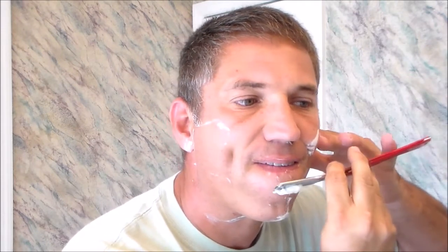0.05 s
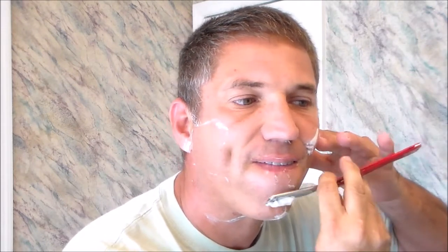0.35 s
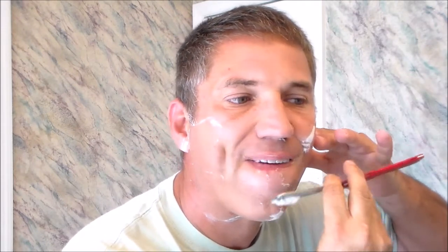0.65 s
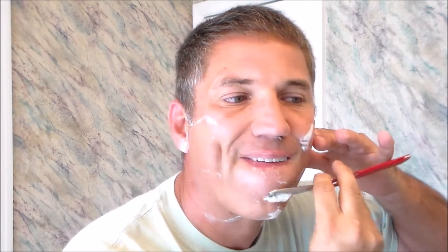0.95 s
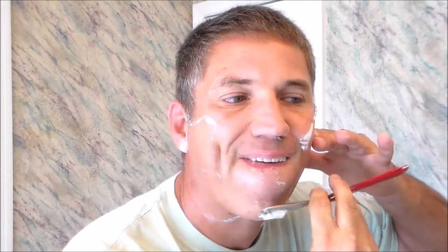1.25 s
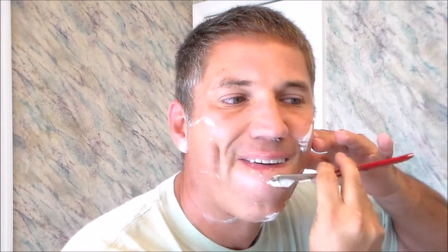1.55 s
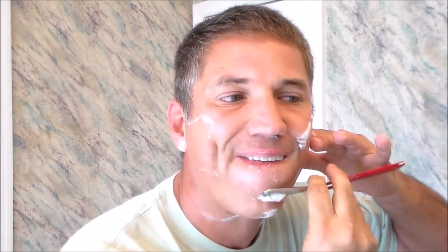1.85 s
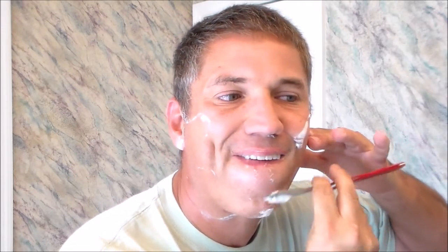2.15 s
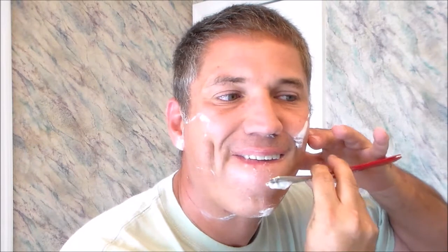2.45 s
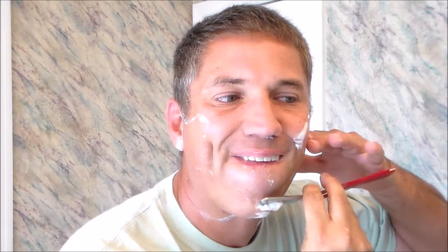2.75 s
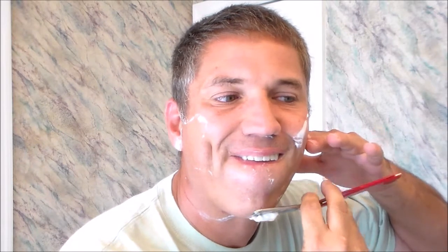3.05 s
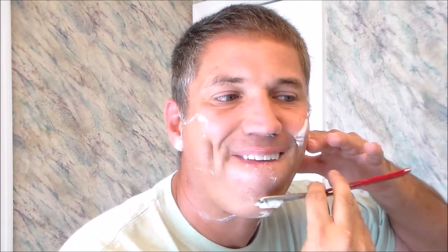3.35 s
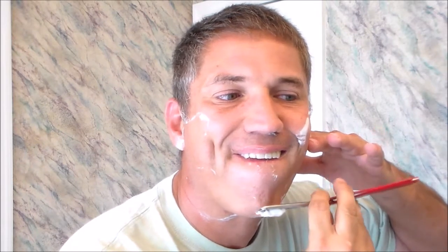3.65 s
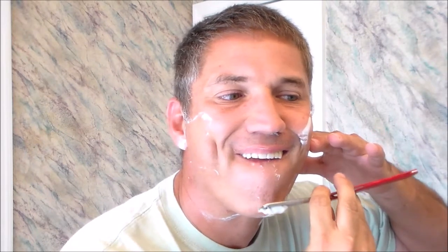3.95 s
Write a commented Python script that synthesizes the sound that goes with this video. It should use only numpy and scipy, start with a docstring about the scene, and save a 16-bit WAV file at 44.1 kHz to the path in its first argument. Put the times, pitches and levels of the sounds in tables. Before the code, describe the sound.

Short, soft razor strokes crackle through chin stubble in a slightly echoing bathroom, the lather ticking twice. A sharp metal clink follows, then dull bumps and a lighter clink. Faint hiss, hum and fan noise continue throughout.

```python
"""A stone-walled bathroom, heard on a closely spaced pair of microphones over mains hum, a fan and hiss.
A razor is drawn over a lathered chin in five short bouts: cut stubble crackles and rings the thin blade,
and the lather gives two wet ticks. Near the end something metal clinks, bumps dully a few times and
clinks again more lightly. Each stroke and contact carries a short tail from the walls."""
import sys
import numpy as np
from scipy import signal
from scipy.fft import rfft, irfft
from scipy.io import wavfile

SR = 44100
rng = np.random.default_rng(int(sys.argv[2]) if len(sys.argv) > 2 else 0)


def transcribe(signal):
    """Save signal, clipped to [-1, 1], as a 16-bit WAV file at the path in sys.argv[1]."""
    frames = np.atleast_2d(signal).T
    limited = np.clip(frames, -1, 1)
    pcm = np.round(limited * 32767).astype(np.int16)
    wavfile.write(sys.argv[1], SR, pcm)


N = 176400
TIME, FREQ = np.arange(N) / SR, np.arange(N // 2 + 1) * SR / N


def undb(db):
    """Decibels to gain."""
    return 10 ** (np.asarray(db) / 20)


def unit(x):
    """Scale to rms 1."""
    return x / np.sqrt(np.mean(x ** 2))


def along(points, hz):
    """Read a table on a log-frequency axis."""
    freqs, values = np.array(points, float).T
    return np.interp(np.log(np.maximum(hz, 1)), np.log(freqs), values)


def colour(points):
    """Causal frequency response of (Hz, dB) points, with mean power 1."""
    cepstrum = irfft(np.log(undb(along(points, FREQ))))
    cepstrum[1:N // 2] *= 2
    cepstrum[N // 2 + 1:] = 0
    response = np.exp(rfft(cepstrum))
    return response / np.sqrt(np.mean(abs(response) ** 2))


def resonance(hz, width):
    """Band-pass response, gain 1 at the centre."""
    return 1j * FREQ * width / (hz ** 2 - FREQ ** 2 + 1j * FREQ * width)


def through(x, response):
    """Pass a sound through a frequency response."""
    return signal.fftconvolve(x, irfft(response)[:N // 10])[:N]


def walk(rate_hz):
    """Random values joined by straight lines."""
    return np.interp(TIME * rate_hz, np.arange(N), rng.standard_normal(N))


def burst(start, decay_s):
    """A rough contact: decaying noise of unit energy."""
    age = TIME - start
    noise = rng.standard_normal(N) * (age >= 0) * np.exp(-np.clip(age / decay_s, 0, 20))
    return noise / np.sqrt(np.sum(noise ** 2))


# likeness of diffuse sound at the two microphones (frequency [Hz], coherence [0-1])
MIC_COHERENCE = [(30, 0.87), (130, 0.74), (290, 0.65), (640, 0.76), (1400, 0.47), (3080, 0.053),
                 (14000, .01)]


def diffuse(size):
    """Spectra of a noise field at two close microphones: alike in the bass, unrelated in the treble."""
    mid, side = rfft(rng.standard_normal((2, size)))
    coherence = along(MIC_COHERENCE, np.arange(len(mid)) * SR / size)
    return mid * np.sqrt(1 + coherence) + np.array([[1], [-1]]) * side * np.sqrt(1 - coherence)


# air and hiss all round the microphones (frequency [Hz], relative density [dB])
AIR_SPECTRUM = [(12, -4), (28, 4), (42, -5), (80, -3.5), (150, -12), (300, -15.5), (520, -17.5), (760, -17),
                (1200, -24), (2200, -28.7), (5000, -31), (10000, -32.5), (14500, -33)]
# harmonics of the mains (frequency [Hz], level [dB])
MAINS_HARMONICS = [(59.95, -51), (120, -71), (179.8, -65), (299.7, -72), (420, -75), (660, -77.5)]


def room_tone():
    """Moving air and hiss, with wavering mains hum and a faint fan drone a little to the right."""
    air = undb(-52) * unit(irfft(undb(along(AIR_SPECTRUM, FREQ)) * diffuse(N)))
    hum = 0
    for hz, db in MAINS_HARMONICS:
        amplitude = np.sqrt(2) * undb(db + walk(rate_hz=3.04))
        hum += amplitude * np.sin(2 * np.pi * (hz * TIME + rng.random()))
    fan_band = resonance(hz=215.5, width=24) ** 2
    fan = undb(-68) * unit(irfft(rfft(rng.standard_normal(N)) * fan_band))
    return air + (hum + fan) * undb([[-1], [1]])


# reverberation of the bathroom (frequency [Hz], t60 [s])
WALL_DECAY = [(125, 0.31), (1500, 0.31), (4000, 0.47), (8000, 0.45), (14000, 0.26)]


def bathroom(x, tail_db, pan_db=0, left_lag_s=0):
    """Direct sound at the pair plus the diffuse tail of the stone walls; pan is left minus right."""
    age = TIME[:N // 5]
    freqs = np.arange(len(age) // 2 + 1) * SR / len(age)
    noise, tail = diffuse(len(age)), 0
    edges_hz = [0, 350, 700, 1400, 2800, 5000, 8000, 11000, 23000]
    for low, high in zip(edges_hz, edges_hz[1:]):
        band = irfft(noise * ((freqs >= low) & (freqs < high)))
        tail += band * undb(-60 * age / along(WALL_DECAY, (low + high) / 2))
    delay_s, build_s = .0031, .0043
    tail *= np.clip((age - delay_s) / build_s, 0, 1)
    tail /= np.sqrt(np.sum(tail ** 2) / 2)
    left = irfft(rfft(x) * np.exp(-2j * np.pi * FREQ * left_lag_s))
    reflected = signal.fftconvolve(x[None], tail, axes=1)[:, :N]
    return (np.array([left, x]) + undb(tail_db) * reflected) * undb([[pan_db / 2], [-pan_db / 2]])


# strokes over the chin (time [s], length [s], level [dB])
RAZOR_STROKES = [(0.435, 0.14, -59), (.598, 0.076, -57.5), (1.058, 0.17, -59), (1.216, 0.077, -52),
                 (1.326, .09, -63), (1.854, .09, -62), (1.956, .04, -59), (2.013, 0.063, -59),
                 (2.06, 0.072, -53), (2.605, 0.11, -62), (2.689, 0.15, -58.5), (2.823, 0.036, -53),
                 (2.875, .06, -58.5), (2.963, 0.03, -55.5), (3.02, 0.057, -63), (3.18, 0.037, -67),
                 (3.461, 0.036, -53.5), (3.51, 0.17, -55.5)]
# the edge catching on stiff hairs (time [s], level [dB])
EDGE_SNAGS = [(.608, -47.5), (.623, -55), (0.659, -57), (1.003, -53.5), (1.098, -51.5), (1.149, -52),
              (1.201, -46.5), (1.383, -51), (1.836, -55), (1.958, -48.5), (2.106, -50), (2.135, -48.5),
              (2.839, -47.5), (2.982, -45.5), (3.062, -50), (3.119, -49), (3.126, -62), (3.198, -56),
              (3.229, -57), (3.522, -49.5), (3.609, -49)]


def stubble():
    """Each hair snaps as a tiny click; the hand judders and the edge snags."""
    attack_s, release_s, snag_s = .012, .022, .0029
    hairs_per_s, spread_db, judder_db = 3000, 3.2, 2.8
    pressure = 0
    for start, length, db in RAZOR_STROKES:
        rise = np.clip((TIME - start) / attack_s + .5, 0, 1)
        fall = np.exp(-np.maximum(TIME - start - length, 0) / release_s)
        pressure += undb(db) * rise * fall
    snaps = (rng.random(N) < hairs_per_s / SR) * rng.choice([-1, 1], N)
    strength = undb(spread_db * np.minimum(rng.exponential(size=N), 6))
    judder = undb(judder_db * walk(rate_hz=55))
    snags = sum(undb(db) * (TIME >= start) * np.exp(-abs(TIME - start) / snag_s)
                for start, db in EDGE_SNAGS)
    return unit(snaps * strength * judder) * pressure + undb(7) * snags * rng.standard_normal(N)


# resonances of the thin blade (frequency [Hz], width [Hz], level [dB])
BLADE_MODES = [(4460, 900, -6), (6880, 700, 3), (9450, 450, -8), (10580, 600, .5), (12900, 550, 5),
               (13800, 1100, 2)]
# broad rasp of the cut (frequency [Hz], level [dB])
RASP_SPECTRUM = [(300, -16), (1500, -24), (2800, -6), (5500, -5.5), (8200, -5.5), (11500, -4.5),
                 (14500, -12)]
# the scrape across the pair (frequency [Hz], left minus right [dB])
MIC_BALANCE = [(3000, 1.5), (7000, -0.5), (10500, -5.5), (13500, -6.5)]


def razor():
    """Snapping stubble rasps and rings the blade; the high treble favours the right microphone."""
    blade_power = sum(abs(undb(db) * resonance(hz, width)) ** 2 for hz, width, db in BLADE_MODES)
    spectrum_db = 10 * np.log10(undb(along(RASP_SPECTRUM, FREQ)) ** 2 + blade_power)
    body = colour(np.column_stack([FREQ, spectrum_db])[1:])
    scrape = bathroom(undb(-5) * through(stubble(), body), tail_db=0, left_lag_s=.00004)
    balance = undb(np.array([[.5], [-.5]]) * along(MIC_BALANCE, FREQ))
    return irfft(rfft(scrape) * balance)


# ticks of lather on the chin (time [s], level [dB])
LATHER_TICKS = [(.8705, -29), (.874, -36), (1.4592, -22), (1.466, -28)]
# tone of a wet tick (frequency [Hz], level [dB])
TICK_SPECTRUM = [(300, -33), (1300, -9), (2300, 1), (3500, -5), (4300, 0.5), (6300, 0), (8000, -13),
                 (14500, -12)]


def lather():
    """Two small wet double ticks near the centre of the pair, as films of lather part."""
    ticks = sum(undb(db) * burst(start, decay_s=.0018) for start, db in LATHER_TICKS)
    return bathroom(through(ticks, colour(TICK_SPECTRUM)), tail_db=-2, pan_db=-1, left_lag_s=.00002)


# metal contacts (time [s], level [dB], dull above [Hz], share of free ring time [0-1], pitch [ratio])
METAL_CONTACTS = [(3.6265, -7.5, 2980, 0.83, 0.99), (3.6289, -15.5, 10000, .3, 0.99),
                  (3.6325, -7.5, 13900, 0.99, 1), (3.642, -16.5, 18000, 0.27, 0.96),
                  (3.8885, -20, 12000, 0.37, .97), (3.910, -26.5, 6000, .5, 0.96)]
# modes of the metal ringing freely (frequency [Hz], level [dB], t60 [s])
METAL_MODES = [(1694, -2.5, .07), (1755, -9, .38), (1782, -8, .1), (3824, 6, 0.027), (3824, -14.5, .2),
               (3910, -10.5, .06), (5510, -5, 0.047), (5556, -13, .25), (6520, -7, .045),
               (6720, -5.5, .045), (7940, -2, 0.034), (8100, -7, 0.063), (8950, -7, 0.033),
               (10350, -2, .02)]
# tone of the crack at contact (frequency [Hz], level [dB])
CRACK_SPECTRUM = [(100, -16), (280, 1), (550, 5.5), (1050, -5.5), (1550, -2), (2300, -4.5), (3900, -5),
                  (7000, -0.5), (9500, -3.5), (14500, -1)]


def metal_clinks():
    """Every contact cracks and rings the same modes; soft ones are duller and held ones ring shorter."""
    clinks = 0
    for start, db, dull_hz, ring_share, pitch in METAL_CONTACTS:
        age = np.maximum(TIME - start, 0)
        ring = sum(undb(mode_db - 60 * age / (t60 * ring_share)) * np.sin(2 * np.pi * hz * pitch * age)
                   for hz, mode_db, t60 in METAL_MODES)
        ring /= np.sqrt(np.sum(ring ** 2))
        crack = through(burst(start, decay_s=.0035), colour(CRACK_SPECTRUM))
        hit = undb(-3) * ring + undb(-3.5) * crack
        pole = np.exp(-2 * np.pi * dull_hz / SR)
        clinks += undb(db) * signal.lfilter([1 - pole], [1, -pole], hit)
    return bathroom(clinks, tail_db=-2.5, pan_db=-1, left_lag_s=.00002)


# bumps of handling (time [s], level [dB])
HANDLING_BUMPS = [(3.810, -20), (3.828, -23.5), (3.849, -20.5), (3.88, -20), (3.962, -24), (3.988, -29)]
# bass-heavy tone of a bump (frequency [Hz], level [dB])
BUMP_SPECTRUM = [(50, 7), (130, 0), (300, -1.5), (500, 2), (1050, -15), (1450, -2.5), (2000, -15),
                 (2800, -16), (4500, -25.5), (14000, -31)]


def handling():
    """Soft contacts bump dully, centred between the microphones."""
    bumps = sum(undb(db) * burst(start, decay_s=.012) for start, db in HANDLING_BUMPS)
    return bathroom(through(bumps, colour(BUMP_SPECTRUM)), tail_db=-2.5)


def scene():
    """The bathroom as it reaches the two microphones."""
    return room_tone() + razor() + lather() + metal_clinks() + handling()


def record(dry):
    """The recorder cuts the top steeply."""
    top_hz = 14150
    return signal.sosfilt(signal.ellip(12, .1, 70, top_hz, fs=SR, output="sos"), dry)


dry = scene()
out = record(dry)
transcribe(out)
```